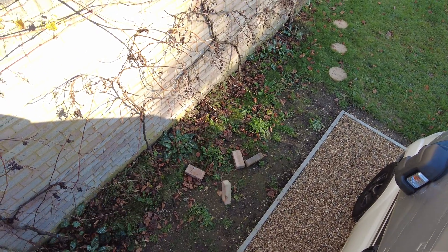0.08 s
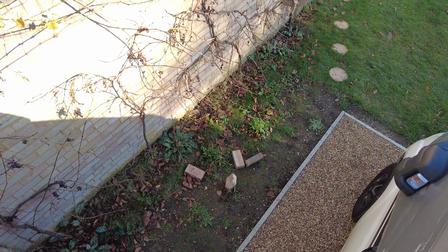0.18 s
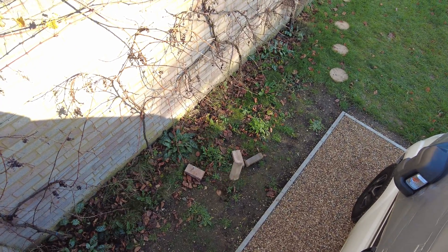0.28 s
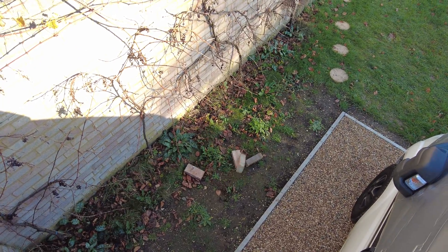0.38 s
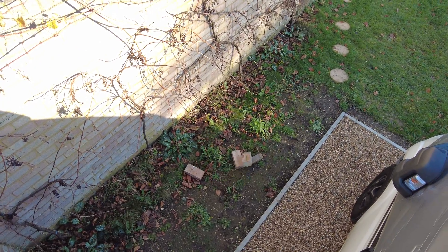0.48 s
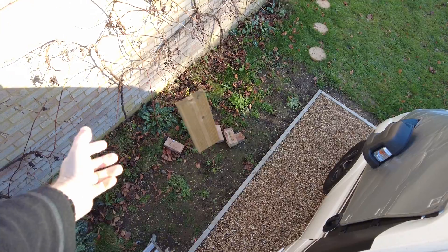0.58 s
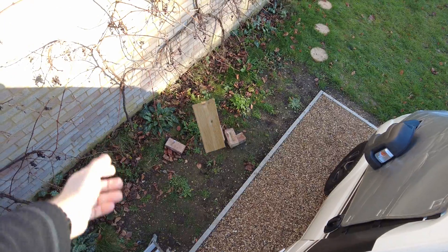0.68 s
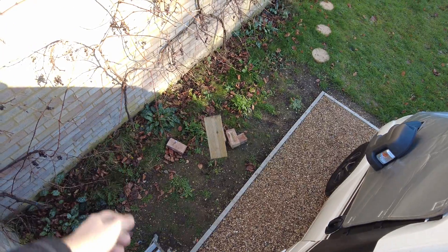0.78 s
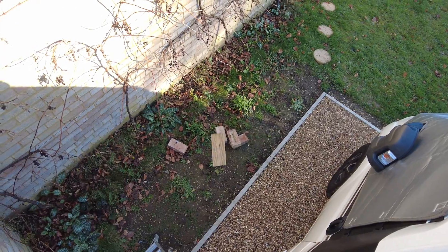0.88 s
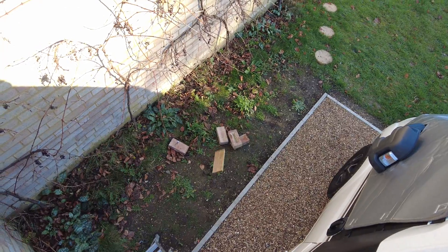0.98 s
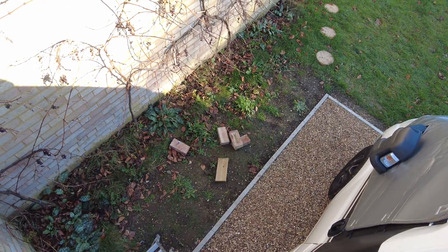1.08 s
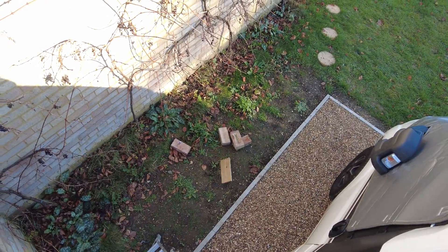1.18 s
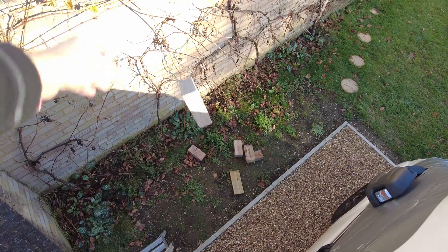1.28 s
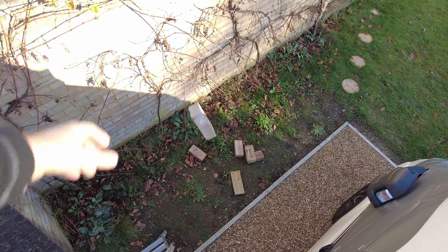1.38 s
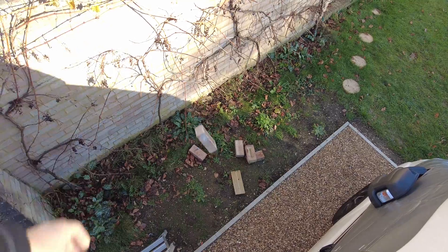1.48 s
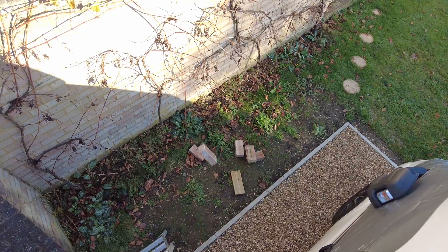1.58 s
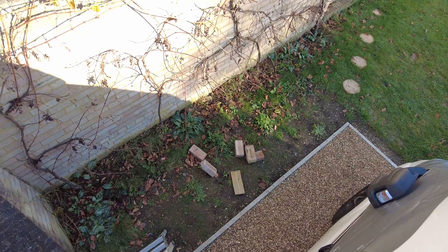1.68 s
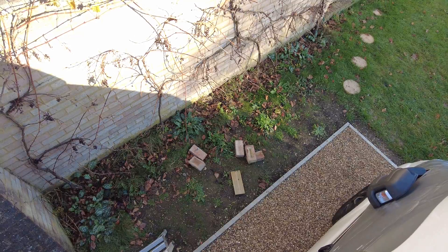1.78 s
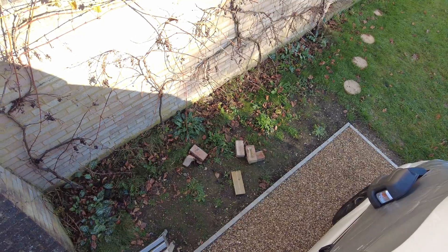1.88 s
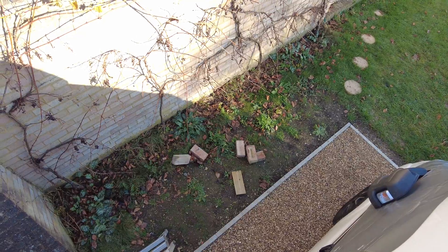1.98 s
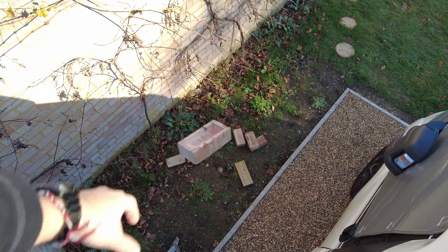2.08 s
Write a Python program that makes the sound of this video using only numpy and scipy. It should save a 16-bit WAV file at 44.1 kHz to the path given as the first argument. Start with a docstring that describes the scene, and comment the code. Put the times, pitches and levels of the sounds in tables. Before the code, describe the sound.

Bricks land in a garden: a deep, gritty, overloaded thud at 0.2 seconds, a hard ringing brick clink at 0.46, a lighter clink at 0.57, cut off abruptly. After a dull low thump at 1.04, a wooden plank knocks twice quickly at 1.1, breaking off at 1.28 with a tiny click. A faint hum joins; at 1.8 bricks clack brightly, leaves settling. Wind rumbles; a wall echoes briefly.

```python
"""A garden beside a house: bricks and a plank are thrown from the roof, one after another.
Blows thud on the soil as low tones with rumble; grit and dry leaves are grainy, fluttering noise.
Bricks clink on bricks lying there and the plank knocks twice: bursts of noise plus ringing sines.
A wall echoes the bricks and grit, wind rumbles as low noise, and a low hum joins near the end.
Twice the ringing, thuds and echoes break off abruptly; the loudest blows overload the microphone."""
import sys
import numpy as np
from scipy import signal
from scipy.fft import rfft, irfft
from scipy.io import wavfile
from scipy.ndimage import uniform_filter1d

SR = 44100
rng = np.random.default_rng(int(sys.argv[2]) if len(sys.argv) > 2 else 0)


def transcribe(u):
    """Save the signal u as a 16-bit wav file named by the first command-line argument.

    u: samples, shape (n,) or (channels, n), limited to [-1, 1]; the rate is SR.
    q: integer samples, one column per channel.
    """
    v = np.clip(np.atleast_2d(u).T, -1, 1)
    q = np.round(v * 32767).astype(np.int16)
    wavfile.write(sys.argv[1], SR, q)


N = 92610  # samples, 2.1 s

WIDTH_HZ, WIDTH_POWER, WIDTH_MAX = 5700, 0.43, 0.95


def undb(db):
    """Turn decibels into a gain."""
    return 10 ** (np.asarray(db) / 20)


def width(hz):
    """Size of the left-right difference against the centre; it grows towards the treble."""
    return np.minimum((hz / WIDTH_HZ) ** WIDTH_POWER, WIDTH_MAX)


def noise(points, spread=1):
    """Stereo noise of rms 1, its spectrum drawn through (f/Hz, level/dB) points."""
    hz = np.fft.rfftfreq(N, 1 / SR) + 1  # the 1 Hz shift avoids log(0)
    point_hz, point_db = np.array(points, float).T
    gain = undb(np.interp(np.log(hz), np.log(point_hz), point_db))
    gain = gain / np.sqrt(1 + (point_hz[0] / hz) ** 4)  # fade out below the first point
    mid, side = rfft(rng.standard_normal((2, N))) * gain
    side = side * spread * width(hz)
    stereo = irfft(np.array([mid + side, mid - side]), N)
    return stereo / stereo.std()


def flutter(step_s):
    """Smooth random wandering of spread 1; a longer step wanders more slowly."""
    wander = uniform_filter1d(rng.standard_normal(N), max(1, int(step_s * SR)))
    return wander / wander.std()


def since(start):
    """Seconds since a moment, zero before it."""
    return np.maximum(np.arange(N) / SR - start, 0)


# moments when the sound breaks off: [t/s]
BREAKS = [.585, 1.284]


def blow(start, t60, rise=.001, hold=0):
    """Loudness curve of a blow: rise, hold and decay by 60 dB in t60, cut at the next break."""
    end = min([b for b in BREAKS if b > start] + [N / SR])
    span = np.arange(int(start * SR) + 1, min(int(end * SR), N))
    t = span / SR - start
    curve = np.zeros(N)
    decay = np.exp(-np.log(1000) * np.maximum(t - hold, 0) / t60)
    curve[span] = np.minimum(t / rise, 1) * decay
    return curve


def tone(start, hz, wander=0):
    """A sine that reaches left and right slightly out of step."""
    lead = rng.choice([-1, 1]) * np.arctan(width(hz) ** 1.9)  # radians, either side may lead
    return np.sin(2 * np.pi * hz * since(start) + wander + lead * np.array([[1], [-1]]))


RING_ROUGH, RING_WOBBLE = 0.11, 0.2  # spread of loudness (share) and of phase (radians)


def ring(start, modes, tilt_db, pivot_hz, envelope):
    """Fading sines, slightly rough and unsteady as the body rubs on what it hit."""
    rough = 1 + RING_ROUGH * flutter(0.0025)
    wander = RING_WOBBLE * flutter(0.011)
    total = 0
    for hz, db, t60 in modes:
        gain = undb(db + tilt_db * np.log2(hz / pivot_hz))
        total = total + gain * envelope(t60) * tone(start, hz, wander)
    return rough * total


CLACK_OCTAVES, CLACK_SKIRT_DB = 0.5, -19  # width of the peak and slope of its skirts
CLACK_TAIL_DB, CLACK_TAIL_T60_S = -22, 0.096


def clack(start, hz, t60):
    """The contact itself: a short burst of noise around one pitch, with a weak tail."""
    shape = []
    for octave in np.arange(-3, 5, .5):
        shape.append((hz * 2. ** octave, CLACK_SKIRT_DB * np.log10(1 + (octave / CLACK_OCTAVES) ** 2)))
    tail = undb(CLACK_TAIL_DB) * blow(start, CLACK_TAIL_T60_S)
    return noise(shape) * (blow(start, t60) + tail)


# spectra of the outdoor murmur before, between and after the breaks: (f/Hz, relative level/dB per Hz)
MURMUR = [
    [(88, -37), (150, -7), (751, -22.5), (1420, -17.5), (2310, -30), (15500, -45.5)],
    [(71, -48.5), (120, -20.5), (192, -3), (245, -15.5), (383, -22), (498, -30.5), (829, -32.5),
     (2200, -48.5), (2440, -50), (11900, -67.5), (15500, -100)],
    [(88, -30), (150, -7), (205, -4), (248, -3), (339, -13.5), (366, -16), (428, -18), (796, -28.5),
     (877, -24), (948, -35.5), (1270, -26), (2140, -37), (15500, -52.5)],
]
# loudness of the murmur in these three parts: [level/dB]
MURMUR_LEVEL = [-49, -36.5, -39]


def murmur():
    """Distant outdoor background: steady noise whose colour and level step at each break."""
    part = np.searchsorted(BREAKS, np.arange(N) / SR)
    total = 0
    for k, (points, db) in enumerate(zip(MURMUR, MURMUR_LEVEL)):
        total = total + undb(db) * noise(points) * (part == k)
    return total


def hum():
    """A low, slightly unsteady sine after the last break."""
    t = np.arange(N) / SR
    unsteady = 1 + 0.18 * flutter(0.041)
    return undb(-38) * np.sin(2 * np.pi * 129 * t) * unsteady * (t > BREAKS[-1])


def break_tick():
    """A tiny click at the last break: one sudden push that dies away."""
    return undb(-16.5) * blow(BREAKS[-1], 0.0045, rise=1 / SR)


# strength of the wind over time: (t/s, level/dB)
WIND_STRENGTH = [(0, -23.5), (.11, -38.5), (.17, -21.5), (.27, -18), (.42, -33), (.58, -30), (.67, -25),
                 (.73, -41), (.9, -38.5), (.95, -24.5), (1.0, -21), (1.27, -22.5), (1.32, -36),
                 (1.58, -40.5), (1.67, -30), (2.1, -30)]
# spectrum of the wind on the microphone: (f/Hz, relative level/dB per Hz)
WIND_SPECTRUM = [(10, -10), (25, 0.5), (48, 0), (80, -10), (150, -14), (400, -37.5), (1000, -69)]


def wind():
    """Wind on the microphone: low rumbling noise that swells and drops."""
    t = np.arange(N) / SR
    return noise(WIND_SPECTRUM) * undb(np.interp(t, *np.array(WIND_STRENGTH).T))


WALL_DB, WALL_T60_S, WALL_DELAY_S = -17.5, 0.19, .011


def wall(sound):
    """Short scattered echo of the house wall: delayed, fading noise, stopping at each break."""
    echo = noise([(200, -1), (3000, -5), (16000, -10.5)]) * blow(WALL_DELAY_S, WALL_T60_S)
    echo = echo * undb(WALL_DB) / np.sqrt(np.sum(echo ** 2) / 2)
    answers = []
    for part in np.split(sound, [int(b * SR) for b in BREAKS], axis=1):
        length = part.shape[1]
        answers.append(signal.fftconvolve(part, echo[:, :length], axes=1)[:, :length])
    return np.hstack(answers)


# blows on the soil: (t/s, tone level/dB, f/Hz, tone t60/s, rumble level/dB)
SOIL_BLOWS = [(.213, 1, 99.7, 0.13, -10.5), (0.462, -15.5, 116.3, 0.16, -15.5),
              (.935, -20.5, 73.7, .2, -36.5), (1.036, -5, 92, 0.14, -17.5),
              (1.168, -13.5, 102.7, 0.22, -27.5), (1.24, -16.5, 116.2, 0.154, -21),
              (1.7831, -8.5, 95.3, 0.23, -18), (1.812, -2, 103.7, 0.11, -14)]
# spectrum of the rumble in the soil: (f/Hz, relative level/dB)
SOIL_SPECTRUM = [(20, -3), (45, 3), (100, -0.5), (170, -1), (400, -8.5), (560, -24), (1000, -43),
                 (3000, -71)]
THUD_RISE_S, SOIL_T60_S = 0.0015, 0.14


def soil():
    """The ground gives under each blow with a low boom and a dull rumble."""
    total = 0
    for start, tone_db, hz, t60, rumble_db in SOIL_BLOWS:
        boom = -undb(tone_db) * tone(start, hz) * blow(start, t60, THUD_RISE_S)
        rumble = undb(rumble_db) * noise(SOIL_SPECTRUM) * blow(start, SOIL_T60_S, THUD_RISE_S)
        total = total + boom + rumble
    return total


# grit and leaves: (t/s, crunch level/dB, settling level/dB, settling t60/s, tilt/dB per octave)
GRIT_CRUNCHES = [(0.212, -7, -26, 0.17, -1), (0.313, -41.5, -65, 0.025, -3), (.463, -16, -47, 0.064, -7.5),
                 (.542, -51, -54, .08, 2), (0.568, -31.5, -28, .15, 0.5), (1.101, -31, -34, 0.11, -10),
                 (1.244, -48, -43.5, 0.14, -6), (1.783, -24.5, -20, 0.23, -2.5),
                 (1.804, -37, -31, 0.81, -1), (2.014, -65, -42.5, 0.62, -2)]
# spectrum of grit and dry leaves before the tilt: (f/Hz, relative level/dB)
GRIT_SPECTRUM = [(300, -18.5), (1400, 0), (3000, -4), (5200, 0.5), (8500, -3), (12000, -8.5), (16000, -7)]
CRUNCH_HOLD_S, CRUNCH_T60_S = 0.0051, 0.02
GRAIN_DB, GRAIN_S = 4, 0.001  # spread and step of the grainy flutter


def grit():
    """Grit and leaves are crushed at once, then settle grain by grain: noise with a fast flutter."""
    total = 0
    for start, crunch_db, settle_db, t60, tilt_db in GRIT_CRUNCHES:
        spectrum = [(hz, db + tilt_db * np.log2(hz)) for hz, db in GRIT_SPECTRUM]
        grains = noise(spectrum) * undb(GRAIN_DB * flutter(GRAIN_S))
        crunch = undb(crunch_db) * blow(start, CRUNCH_T60_S, hold=CRUNCH_HOLD_S)
        settling = undb(settle_db) * blow(start, t60)
        total = total + grains / grains.std() * (crunch + settling)
    return total


# ringing of the plank before tilt, focus and shortening: (f/Hz, relative level/dB, t60/s)
PLANK_RINGING = [(237, -6, .08), (300, -21, 0.021), (487, -15, 0.14), (626, -13.5, 0.093), (710, 4, 0.029),
                 (767, -12, 0.29), (923.4, -13, 0.13), (987, -1.5, .04), (1127, -8.5, 0.083),
                 (1187, -5, 0.12), (1563, -15, 0.12), (2830, -15, 0.052), (3350, -17, 0.059),
                 (4860, -14, .04)]
# plank on the ground: (t/s, ring level/dB, tilt/dB per octave, share of the ringing and tail times,
# crack level/dB, clack level/dB, clack f/Hz)
PLANK_KNOCKS = [(1.1018, -11, 4, 0.89, -8.5, -10.5, 640), (1.127, -5.5, 4, 0.91, -2, -3, 997)]
# spectrum of the crack: (f/Hz, relative level/dB)
CRACK_SPECTRUM = [(60, -14.5), (250, -6), (700, 0.5), (1150, -5.5), (1900, -20), (3000, -18.5),
                  (5000, -29.5), (8000, -36.5), (16000, -54)]
CRACK_T60_S, CRACK_TAIL_DB, CRACK_TAIL_T60_S = 0.048, -14.5, 0.24
KNOCK_T60_S = 0.027
FOCUS_DB, FOCUS_OCTAVES = 9, 0.2  # each end of the plank favours the modes near its clack


def plank():
    """One end strikes with a low clack, then the other slaps down higher; the wood rings."""
    total = 0
    for start, ring_db, tilt_db, share, crack_db, clack_db, clack_hz in PLANK_KNOCKS:
        tail = undb(CRACK_TAIL_DB) * blow(start, CRACK_TAIL_T60_S * share)
        crack = (blow(start, CRACK_T60_S, hold=0.0022) + tail) * noise(CRACK_SPECTRUM, spread=0)
        modes = []
        for hz, db, t60 in PLANK_RINGING:
            octaves_away = np.log2(hz / clack_hz)
            modes.append((hz, db + FOCUS_DB * np.exp(-(octaves_away / FOCUS_OCTAVES) ** 2), t60))
        wood = ring(start, modes, tilt_db, 670, lambda t60: blow(start, t60 * share, rise=0.0016))
        contact = clack(start, clack_hz, KNOCK_T60_S)
        total = total + undb(crack_db) * crack + undb(ring_db) * wood + undb(clack_db) * contact
    return total


# ringing for each kind of brick contact before the tilt: name -> (f/Hz, relative level/dB, lasting t60/s)
BRICK_RINGING = { "whole": [(2309, -2, .18), (2360, -19, .1), (2610, -17, 0.13), (3787, -16.5, 0.12),
                 (4904, -18.5, .11), (5220, -17.5, .035), (5701, -33.5, .1), (7050, -20.5, 0.065),
                 (7250, -30, .04), (8200, -29, .04), (9800, -27.5, .04)], "corner": [(2268, -2, 0.21),
                 (3820, -13, 0.11), (5350, -3.5, .25), (6309, -10, .1), (7570, -3, .25), (7700, -10, 0.089),
                 (10300, -11, 0.18)], "small": [(2810, -7.5, .13), (2876, -10, .07), (3187, 1, 0.12),
                 (3098, -1.5, 0.063), (4630, -9, 0.22), (6265, -9.5, 0.13), (6730, -11, .06),
                 (7843, -22, .11)]}
# brick on brick: (t/s, contact kind, ring level/dB, ring tilt/dB per octave, ring hold/s, # lasting part
# level/dB, clack level/dB, clack f/Hz, clack t60/s, left minus right level/dB)
BRICK_CLINKS = [(.2135, "whole", -15.5, 2.5, .004, -1.5, -12, 1060, 0.036, -2),
                (0.45, "whole", -33, 1, .003, -8, -21, 980, 0.17, -0.5),
                (0.461, "whole", 3, -6, 0.012, -14.5, -2, 800, 0.074, -5),
                (.549, "corner", -39, -0.5, 0.0024, -5, -23, 500, 0.11, 12),
                (.569, "corner", -24.5, 0.5, 0.009, -9.5, -16, 694, 0.042, -3),
                (1.7818, "small", -19, -3, .002, -12, -11, 8500, 0.012, 6),
                (1.8016, "small", -8.5, 0, 0.008, -14.5, 0.5, 1480, 0.024, -2.5),
                (1.815, "small", -24, -3, .002, -9, -16.5, 500, 0.032, 2)]
RING_RISE_S, RING_EARLY_SHARE = 0.0046, .3  # the early part dies in this share of the lasting t60


def bricks():
    """A clack at the contact, then the brick rings: one part dies early, another lasts."""
    total = 0
    for (start, kind, ring_db, tilt_db, hold, late_db,
         clack_db, clack_hz, clack_t60, pan_db) in BRICK_CLINKS:
        def fade(t60):
            early = blow(start, t60 * RING_EARLY_SHARE, RING_RISE_S, hold)
            return early + undb(late_db) * blow(start, t60, RING_RISE_S, hold)

        modes = BRICK_RINGING[kind]
        pan = undb(np.array([[pan_db], [-pan_db]]) / 2)
        clink = ring(start, modes, tilt_db, modes[0][0], fade) * pan
        contact = clack(start, clack_hz, clack_t60)
        total = total + undb(clack_db) * contact + undb(ring_db) * clink
    return total


def scene():
    """All landings in the garden; between the breaks left and right are the same."""
    background = murmur() + hum() + break_tick() + wind()
    hard = grit() + bricks()
    garden = background + wall(hard) + soil() + plank() + hard
    between = np.searchsorted(BREAKS, np.arange(N) / SR) == 1
    return np.where(between, garden.mean(axis=0), garden)


CEILING, TOP_HZ = 0.99, 15750


def record(dry):
    """The microphone overloads, flattening the loudest peaks; a steep filter cuts the top treble."""
    overloaded = np.clip(dry, -CEILING, CEILING)
    top_cut = signal.ellip(10, .1, 70, TOP_HZ, fs=SR, output="sos")
    return signal.sosfilt(top_cut, overloaded)


dry = scene()
out = record(dry)
transcribe(out)
```